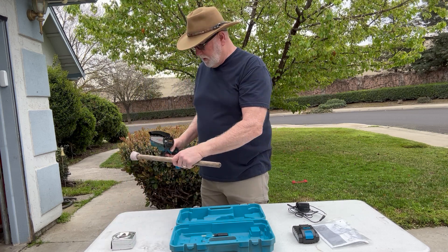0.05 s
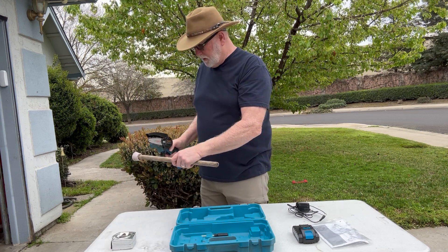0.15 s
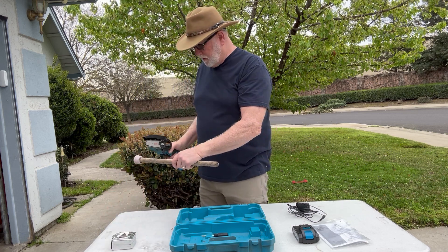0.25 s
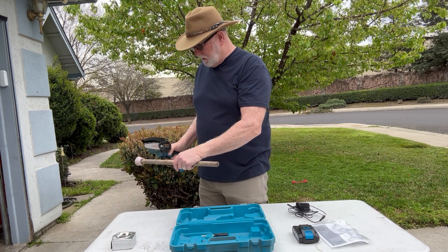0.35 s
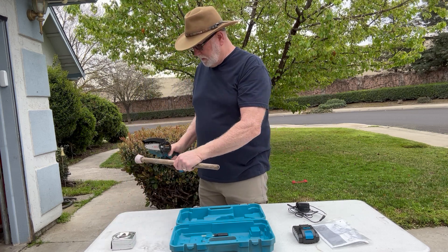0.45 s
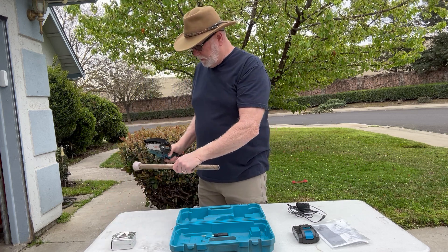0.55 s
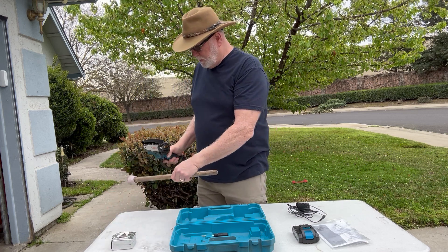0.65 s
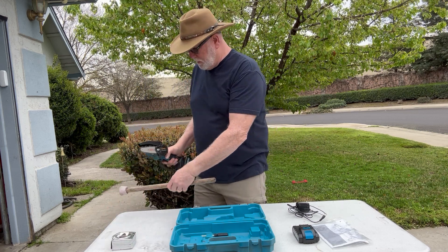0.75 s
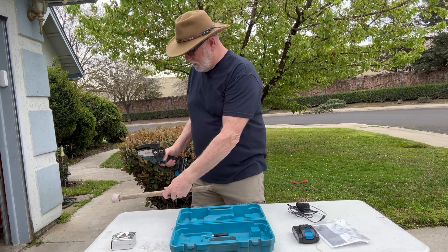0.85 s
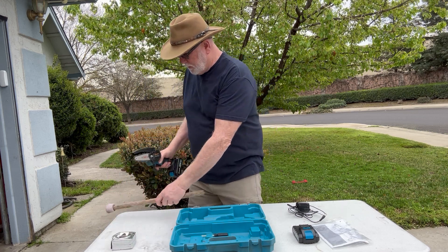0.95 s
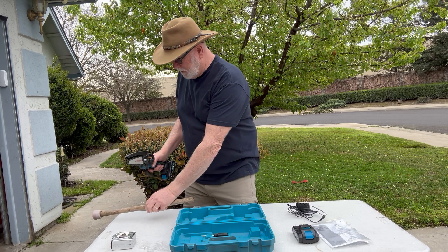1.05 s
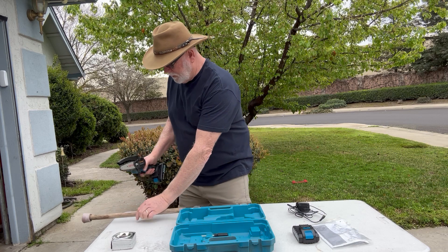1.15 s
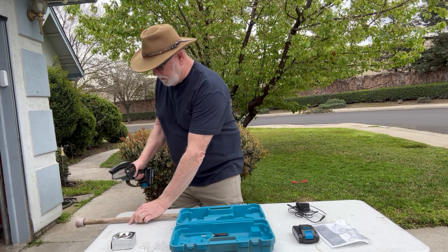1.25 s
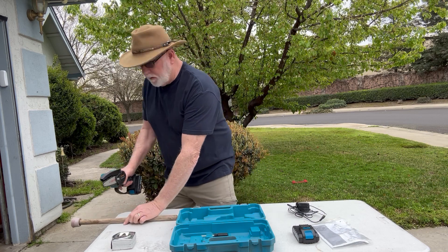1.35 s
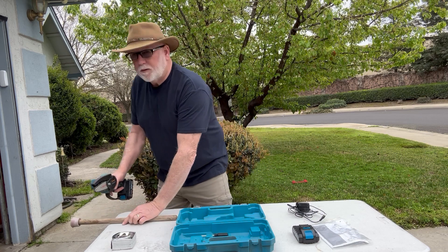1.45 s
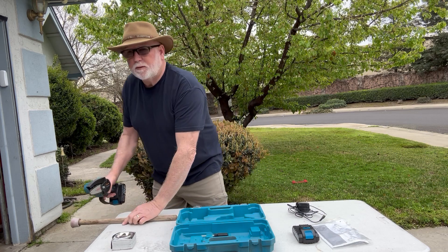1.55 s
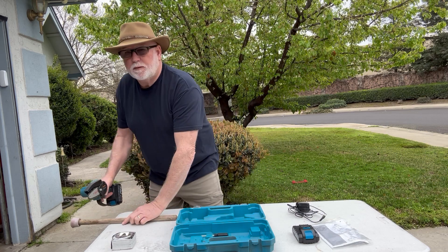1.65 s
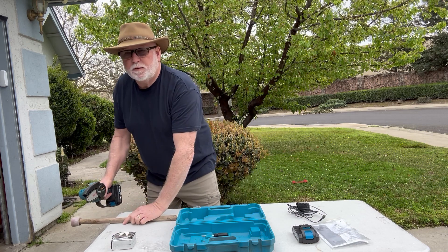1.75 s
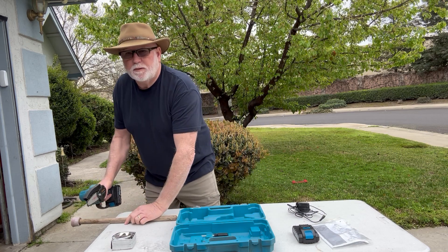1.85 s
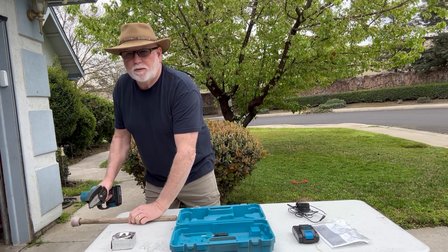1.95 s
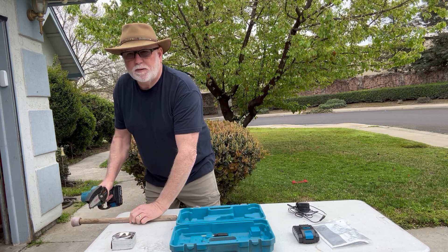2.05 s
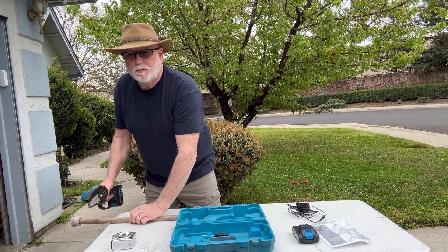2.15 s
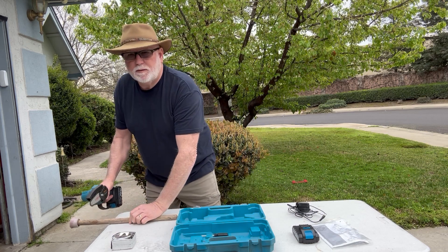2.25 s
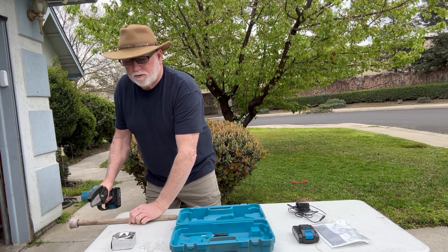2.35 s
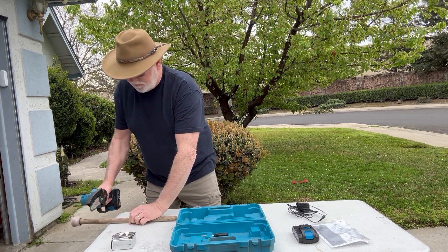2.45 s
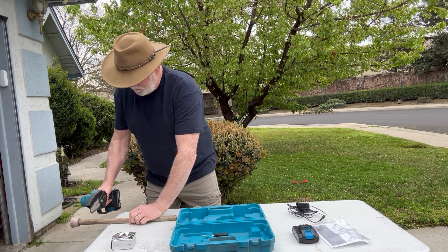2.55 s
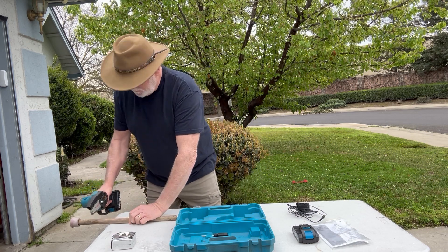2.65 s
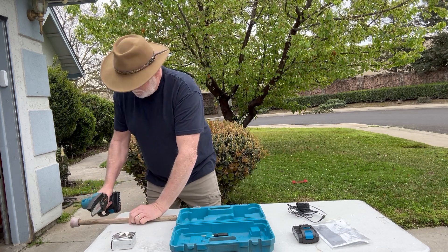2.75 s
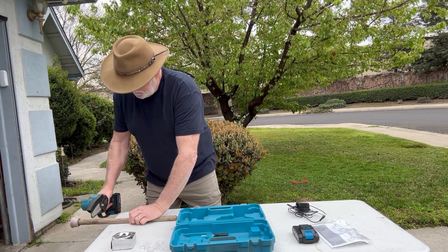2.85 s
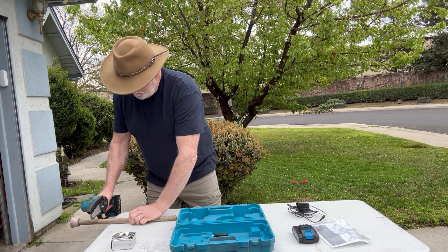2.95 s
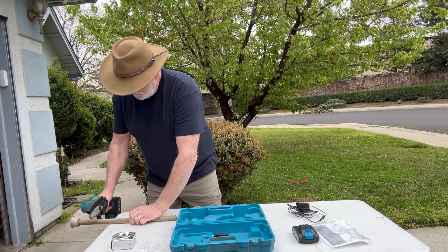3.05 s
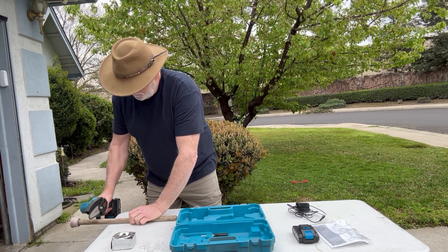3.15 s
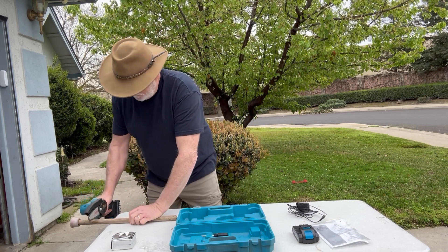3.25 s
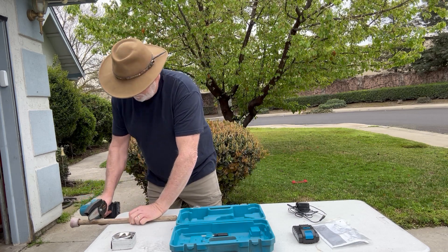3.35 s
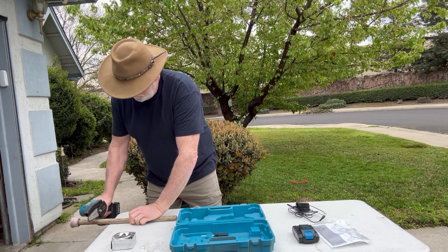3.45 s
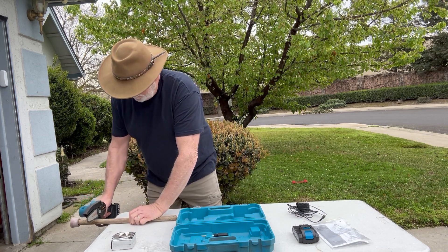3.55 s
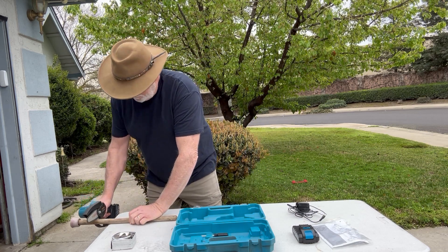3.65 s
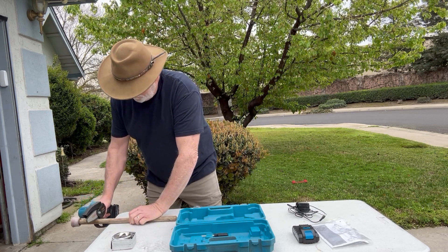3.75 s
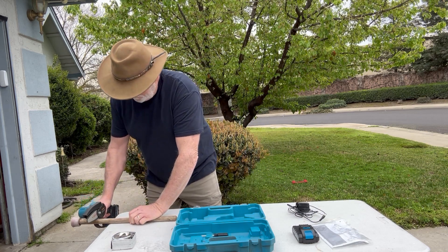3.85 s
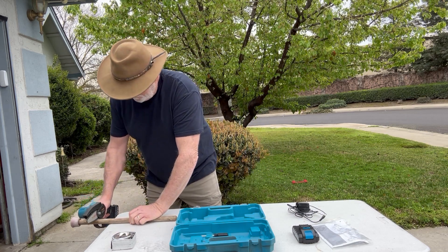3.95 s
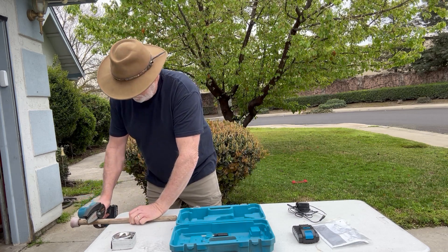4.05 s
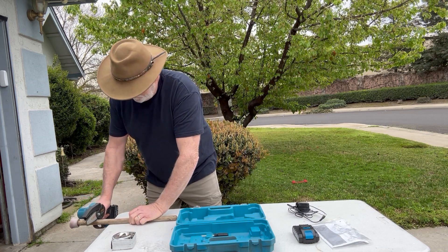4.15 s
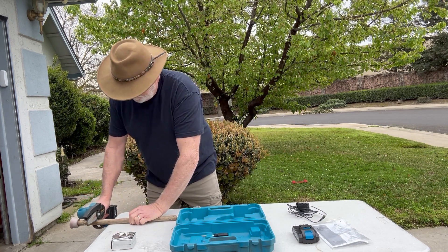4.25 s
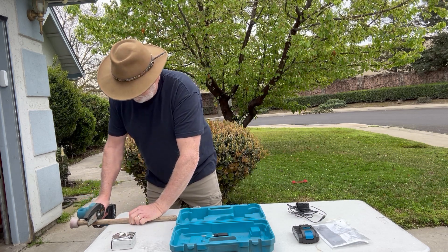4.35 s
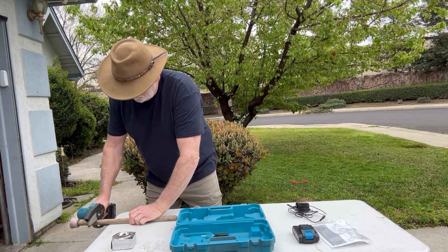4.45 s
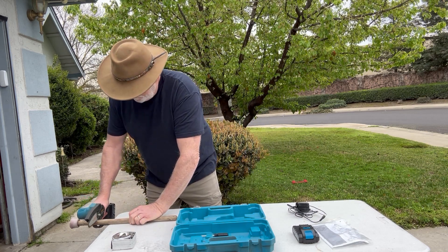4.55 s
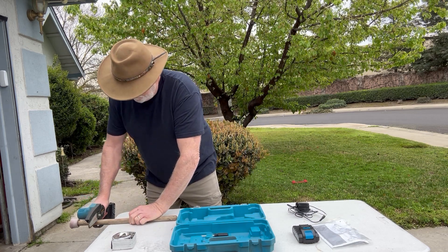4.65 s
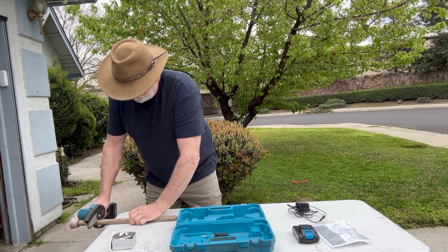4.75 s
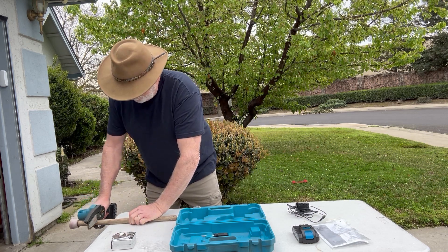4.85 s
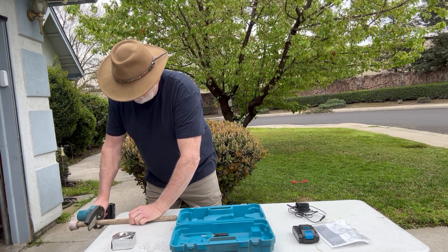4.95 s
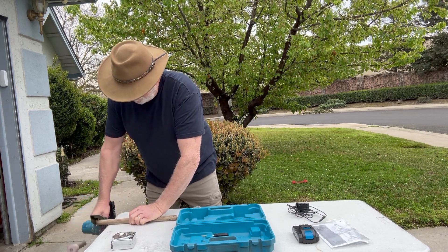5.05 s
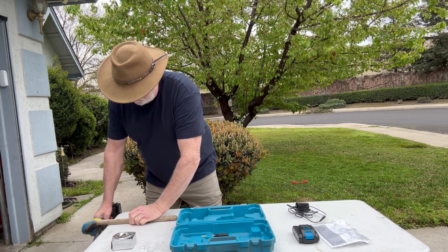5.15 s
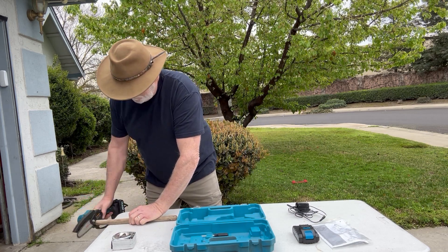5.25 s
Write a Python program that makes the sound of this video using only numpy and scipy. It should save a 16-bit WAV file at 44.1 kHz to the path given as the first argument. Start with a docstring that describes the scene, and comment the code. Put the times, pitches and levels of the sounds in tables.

```python
"""A small cordless chainsaw on a front lawn, close by: noise and sines follow its sprocket, then bites ring a rod.
Before that the wooden rod is laid on a plastic folding table: blows ring damped modes, cloth hisses, ticks click.
The saw runs free, skips, then cuts through the rod end, which drops onto paving.
Far traffic hums as shaped noise; a bird trills twice, a whistle in falling phrases.
A pair of close microphone ports hears the table from the left, with echoes off a house wall."""
import sys
import numpy as np
from scipy import signal
from scipy.fft import rfft, irfft, next_fast_len
from scipy.io import wavfile
from scipy.ndimage import uniform_filter1d

SR = 44100
rng = np.random.default_rng(int(sys.argv[2]) if len(sys.argv) > 2 else 0)


def log_audio(samples):
    """Write samples as a 16-bit WAV file to the path given in sys.argv[1]."""
    # one column per channel
    frames = np.atleast_2d(samples).T
    # limit to full scale, then quantise
    limited = np.clip(frames, -1, 1)
    pcm = np.round(limited * 32767).astype(np.int16)
    wavfile.write(sys.argv[1], SR, pcm)


N = 233461
TIME_S = np.arange(N) / SR
CONTACT_HZ = 1500   # softness of the skips and jolts of the bar on the rod


def from_db(db):
    """Decibels to an amplitude factor."""
    return 10 ** (np.asarray(db) / 20)


def rms_one(x):
    """Scale to rms 1."""
    return x / np.sqrt(np.mean(x ** 2) + 1e-20)


def evened(x, seconds):
    """Chance swells slower than the given time are levelled out; rms 1."""
    power = uniform_filter1d(np.mean(x ** 2, axis=0), round(seconds * SR))
    return x / np.sqrt(power + 1e-12)


def in_time(rows):
    """Columns as sample curves; the last output is 1 within the table's span, else 0."""
    s, *columns = np.transpose(rows)
    within = (TIME_S >= s[0]) & (TIME_S <= s[-1])
    return [np.interp(TIME_S, s, column) for column in columns] + [within]


def at_hz(points, hz):
    """Read a table of values along a logarithmic frequency axis."""
    p = np.array(points, float)
    return np.interp(np.log(hz + 1), np.log(p[:, 0] + 1), p[:, 1])


def shaped(x, response):
    """Filter by a function of frequency."""
    size = next_fast_len(N + SR // 2)
    hz = np.arange(size // 2 + 1) * SR / size
    return irfft(rfft(x, size) * response(hz), size)[..., :N]


def drift(rate_hz):
    """Slow chance with spread 1."""
    r = np.exp(-2 * np.pi * rate_hz / SR)
    slow = signal.lfilter([1], [1, -2 * r, r * r], rng.standard_normal(N + SR))
    return rms_one(slow[SR:])


def lagged(db, seconds):
    """A level that follows late and smoothly."""
    r = np.exp(-1 / (seconds * SR))
    return signal.lfilter([1 - r], [1, -r], from_db(db))


def dying(x, t60_s):
    """Each sample of x leaves a tail that falls 60 dB in the given time."""
    return signal.lfilter([1], [1, -from_db(-60 / (t60_s * SR))], x)


def ring(force, modes, bend_s=0):
    """Each mode rings on the force, neighbours in opposite sign; a wandering delay bends its pitch."""
    out, n = 0, np.arange(N)
    for k, (hz, level_db, t60) in enumerate(modes):
        r, w = from_db(-60 / (t60 * SR)), 2 * np.pi * hz / SR
        mode = signal.lfilter([0, np.sin(w)], [1, -2 * r * np.cos(w), r * r], force + 1e-18)
        mode = np.atleast_2d(mode)
        if bend_s:
            read = n + bend_s * SR * drift(3.18)
            mode = np.array([np.interp(read, n, side) for side in mode])
        out = out + (-1) ** k * from_db(level_db) * mode
    return out


def grains(per_s, spread_db):
    """Random clicks of uneven size and sign."""
    sizes = from_db(spread_db * np.minimum(rng.exponential(1, N), 4))
    signs = rng.choice([-1, 1], N)
    return sizes * signs * (rng.random(N) < per_s / SR)


def blows(rows, contact_hz):
    """A click for each row, softened by the contact."""
    force = np.zeros(N)
    for s, level_db in rows:
        force[round(s * SR)] = from_db(level_db)
    r = np.exp(-2 * np.pi * contact_hz / SR)
    return signal.lfilter([1 - r], [1, -r], force)


# part of the clatter that reaches each port by its own path: [f/Hz, share 0-1]
OWN_SHARE = [(150, 0), (500, 0.12), (3000, 0.45), (6000, 0.45), (10000, 0.1)]


def paired(make):
    """One common draw plus a smaller draw for each port."""
    share = lambda hz: np.clip(at_hz(OWN_SHARE, hz), 0, 1)
    common = shaped(rms_one(make()), lambda hz: np.sqrt(1 - share(hz)))
    own = rms_one(np.array([make(), make()]))
    return common + shaped(own, lambda hz: np.sqrt(share(hz)))


# colour of the far traffic: [f/Hz, level per Hz/dB]
TRAFFIC = [(12, -49), (20, -56), (50, 0.5), (104, -1.5), (223, -8.5), (257, -16), (478, -13), (684, -16),
           (1050, -19), (1130, -20), (1400, -20), (2310, -34), (4600, -57.5), (6000, -59), (7800, -91),
           (13200, -120)]
# how alike the traffic is at left and right: [f/Hz, likeness -1 to 1]
TRAFFIC_LIKENESS = [(25, 0.56), (60, 1), (130, 0.92), (240, 0.75), (950, -0.12), (3770, 0.37), (15000, 0.4)]
# the far rumble gets weaker towards the end: [t/s, level/dB]
TRAFFIC_FADE = [(0, 1), (3.8, 0.5), (5.29, -3.5)]
TRAFFIC_DB = -38.5   # before the fade


def traffic():
    """Low rumble from afar, noise alike on both sides in the bass, swelling slowly."""
    mid, side = rng.standard_normal((2, N))
    alike = lambda hz: np.clip(at_hz(TRAFFIC_LIKENESS, hz), -1, 1)
    colour = lambda hz: from_db(at_hz(TRAFFIC, hz))
    mid = shaped(mid, lambda hz: colour(hz) * np.sqrt(1 + alike(hz)))
    side = shaped(side, lambda hz: colour(hz) * np.sqrt(1 - alike(hz)))
    pair = rms_one(np.array([mid + side, mid - side]))
    level_db = TRAFFIC_DB + in_time(TRAFFIC_FADE)[0] + 1.0 * drift(1.0)
    return from_db(level_db) * pair * from_db([[.9], [-.9]])   # a little louder at the left


# colour of the cloth hiss: [f/Hz, level per Hz/dB]
CLOTH = [(1200, 0), (2500, 5.5), (3400, -4), (4300, 5.5), (6000, -3), (7700, -2), (11000, -5.5),
         (15700, -18)]
# cloth and hands sliding: [t/s at the height, level/dB, rise/dB per s, fall/dB per s]
SLIDES = [(.22, -65, 400, 450), (.37, -65, 267, 450), (.745, -54.5, 520, 170), (1.11, -61, 49, 180),
          (1.32, -53, 202, 113), (1.55, -59, 107, 64), (1.701, -37.5, 251, 252), (1.97, -67, 100, 330)]
# small ticks of handled wood and tool, the trigger click, and last the sharp click of the offcut landing:
# [t/s, click level/dB]
TICKS = [(0.2094, -50), (0.2364, -49), (0.3554, -57), (0.3661, -60), (0.7317, -39), (0.764, -32),
         (0.7824, -42), (1.4745, -51), (1.5863, -48), (1.7933, -57), (2.2546, -15), (5.2112, -8)]


def handling():
    """Grainy cloth hiss swells with each slide; short dry ticks, and a crack on top of knocks and landing."""
    swells = sum(from_db(db - np.maximum(rise * (s - TIME_S), fall * (TIME_S - s)))
                 for s, db, rise, fall in SLIDES)
    hiss = rng.standard_normal(N) + 0.6 * rms_one(grains(per_s=600, spread_db=3.5))
    hiss = rms_one(shaped(hiss, lambda hz: from_db(at_hz(CLOTH, hz)) * (hz > 600)))
    # each tick is a sharp click followed by a short burst of noise
    cracks = [(s, crack_db) for s, _, crack_db in KNOCKS]
    clicks = blows(TICKS + cracks, contact_hz=15000)
    burst = dying(clicks, t60_s=0.029) * rng.standard_normal(N)
    band = signal.butter(1, [2000, 5500], "band", fs=SR, output="sos")
    return swells * hiss + signal.sosfilt(band, 2.7 * clicks + 0.78 * burst)


# phrases of the two bird trills: [t/s, length/s, starting f/Hz, starting level/dB]
PHRASES = [(0.317, 0.07, 7040, -66), (0.36, 0.046, 7050, -52.5), (0.402, 0.062, 7360, -52),
           (0.466, 0.064, 7350, -57), (0.53, 0.055, 7360, -59), (.605, 0.057, 7430, -69),
           (.652, .05, 7300, -80), (1.742, 0.04, 6900, -51), (1.795, 0.049, 7340, -57),
           (1.86, .06, 7300, -61), (1.925, 0.051, 7320, -63), (2.0, .06, 7300, -75)]
PHRASE_FALL_HZ, PHRASE_FADE_DB = 600, 15.5   # over one phrase
WARBLE_HZ, WARBLE_DEPTH_HZ = 49.3, 890   # rate of the dips; deepest at the end of a phrase


def bird():
    """A whistle in short falling phrases that end in quick dips, smeared by echoes among leaves."""
    hz, level = np.zeros(N), np.zeros(N)
    uneven = 0.3 * drift(21)
    for s, length_s, start_hz, db in PHRASES:
        through = (TIME_S - s) / length_s      # 0 to 1 through the phrase
        on = (through >= 0) & (through < 1)
        swing = np.sin(2 * np.pi * WARBLE_HZ * (TIME_S - s) + 0.94 + uneven)
        dips = WARBLE_DEPTH_HZ * through ** 2 * np.maximum(swing, 0) ** 4
        hz[on] = (start_hz - through * (PHRASE_FALL_HZ + dips))[on]
        onset = np.minimum(through[on] / 0.04, 1)
        level[on] = from_db(db - PHRASE_FADE_DB * through[on]) * onset
    phase = 2 * np.pi * np.cumsum(hz + 40 * drift(200)) / SR
    whistle = level * from_db(1.3 * drift(150)) * np.sin(phase)
    leaves = rng.standard_normal((2, SR // 5)) * from_db(-28 - 60 * TIME_S[:SR // 5] / 0.25)
    return whistle + signal.fftconvolve(whistle[None], leaves, axes=1)[:, :N]


# rod knocking on the table, with bounces, and jumping as the end snaps off:
# [t/s, blow level/dB, crack level/dB]
KNOCKS = [(1.26, -25, -54), (1.268, -21.5, -62), (1.28, -33.5, -64), (1.309, -14, -33), (1.321, -26, -55),
          (1.353, -26, -50), (1.395, -30, -80), (5.039, -19.5, -31), (5.112, -32, -54)]
# modes of loose rod and bare table top: [f/Hz, level/dB, t60/s]
LOOSE = [(123.6, -1, 0.16), (157, -5.5, 0.15), (186.2, -9, 0.47), (222, -10.5, 0.17), (280.4, -7, 0.23),
         (394, -5, 0.084), (440.6, -7.5, 0.23), (517, 1.5, 0.061), (577, -0.5, 0.14), (627, -5.5, 0.062),
         (960, -2.5, 0.014), (1067, -15.5, 0.041), (1260, -3.5, 0.028), (1530, -9.5, 0.014),
         (1970, 0.5, 0.007), (2260, -5, 0.008), (3180, 0.5, 0.004), (4830, -4, 0.0035)]
# cut end landing on paving: [t/s, blow level/dB]
LANDING = [(5.2112, -21), (5.2153, -6), (5.2222, -12)]
# modes of the cut end: [f/Hz, level/dB, t60/s]
OFFCUT = [(1760, -4, 0.02), (2240, 2, 0.017), (2920, 14, 0.011), (5600, 15, .006), (7300, 0, 0.009)]
KNOCK_CONTACT_HZ = 800   # the plastic top gives under the rod


def knocks():
    """The rod hits the table and rattles briefly after each blow; the offcut hits the paving."""
    laid = blows([(s, blow_db) for s, blow_db, _ in KNOCKS], KNOCK_CONTACT_HZ)
    rattle = dying(laid, t60_s=.08) * rms_one(grains(per_s=2800, spread_db=2.5))
    rod = ring(laid + from_db(-27.5) * rattle, LOOSE, bend_s=0.000298)
    offcut = ring(blows(LANDING, contact_hz=9000), OFFCUT)
    return from_db(-5.0) * rod + from_db(-19.5) * offcut


# chain and housing, broad colour: [f/Hz, level per Hz/dB]
CHAIN = [(200, -16), (320, -22), (500, -13), (950, -16), (1700, -3), (2900, -7), (4600, -5), (7500, -1),
         (10500, -1), (12500, -4), (14300, -4), (15700, -2)]
# housing and bar resonances: [f/Hz, width/Hz, level above the colour/dB]
HOUSING = [(668, 54, 14), (713, 56, 18), (780, 45, 15), (1350, 94, 1.5), (1750, 190, -2), (1990, 200, 2),
           (2150, 600, 2), (2970, 83, -23), (3920, 1640, 3.5), (4026, 90, 8), (7290, 650, 0)]


def housing_colour(hz):
    """Broad colour with steep-sided resonance humps."""
    humps = sum(from_db(2 * db) / (1 + (2 * (hz - mid_hz) / width_hz) ** 2) ** 2
                for mid_hz, width_hz, db in HOUSING)
    return from_db(at_hz(CHAIN, hz)) * np.sqrt(1 + humps)


# chain speed, sagging under load: [t/s, drive links per s]
SPEED = [(2.24, 320), (2.33, 356), (2.40, 384), (2.55, 394), (3.67, 397), (3.86, 380), (4.2, 378),
         (4.3, 372), (4.6, 368), (5.0, 372), (5.1, 385), (5.29, 340)]
SPROCKET_TEETH, CUTTERS_PER_TURN = 7, 2


def sprocket_turns():
    """Angle of the sprocket in radians; each tooth carries one drive link."""
    links_per_s, _ = in_time(SPEED)
    return 2 * np.pi * np.cumsum(links_per_s) / SR / SPROCKET_TEETH


# level of the chain hiss, weaker in parts of the cut and after it, fading as the saw runs down:
# [t/s, level/dB]
HISS = [(2.24, -73), (2.25, -43.5), (2.26, -34), (2.3, -26.5), (2.68, -26), (2.99, -26.5), (4.1, -26),
        (4.25, -32), (4.28, -26), (5.0, -31), (5.02, -35), (5.22, -33), (5.29, -36.5)]
# side tones of the drive: [multiple of the sprocket turn, level against the hiss/dB]
DRIVE_TONES = [(6, -25.5), (12.6, -23), (14, -28), (28, -29)]
BODY_HZ, BODY_RISE_S = 1100, .025   # the low clatter of the housing blooms after the hiss
HUM_LOSS_DB = 8   # the wood damps the hum of the housing from the first bite on
TONE_LOCKS_S, TONE_RISE_DB_PER_S = 2.35, 220   # the drive tones emerge as the chain comes up to speed
TONE_UNDER_HISS_DB = -9.5
TONE_SETTLES_DB_PER_S = 2.5   # then the link tone slowly weakens
TONE_UNDER_BITE_DB, TONE_LOSS_DB_PER_S = -8, 12.5   # wood passes the tone on, less as the kerf deepens
TONE_WAVER_DB = 2.5
CUT_THROUGH_S, TONE_FREED_DB = 5.0, 4.5   # the link tone stands clear again once the bar is through


def saw(turns, bite_db):
    """Links clatter along the bar in time with sprocket and teeth; the drive hums at multiples of the turn."""
    hiss_db, running = in_time(HISS)
    first_bite_s = BITE[0][0]
    beat_db = np.cos(turns) + 1.14 * np.cos(CUTTERS_PER_TURN * turns) + np.cos(SPROCKET_TEETH * turns)
    clatter = paired(lambda: rng.standard_normal(N) + .5 * rms_one(grains(per_s=2500, spread_db=2.0)))
    clatter = shaped(clatter * from_db(beat_db + 1.11 * drift(26)), housing_colour)
    body = signal.sosfilt(signal.butter(2, BODY_HZ, fs=SR, output="sos"), clatter)
    clatter = clatter - body * np.exp(-np.maximum(TIME_S - HISS[0][0], 0) / BODY_RISE_S)
    hum = shaped(clatter, lambda hz: (hz > 620) & (hz < 860))
    clatter = clatter - hum * (1 - lagged(-HUM_LOSS_DB * (TIME_S > first_bite_s), seconds=0.03))

    since_s = TIME_S - TONE_LOCKS_S
    locked = from_db(TONE_RISE_DB_PER_S * np.minimum(since_s, 0))
    sides = sum(from_db(db + 1.9 * drift(4.8)) * np.sin(k * turns + rng.uniform(0, 2 * np.pi))
                for k, db in DRIVE_TONES)
    free_db = hiss_db + TONE_UNDER_HISS_DB - TONE_SETTLES_DB_PER_S * since_s + 1.0 * drift(39)
    free = from_db(free_db) * locked * lagged(TONE_FREED_DB * (TIME_S > CUT_THROUGH_S), seconds=0.05)
    loaded_db = bite_db + TONE_UNDER_BITE_DB - TONE_LOSS_DB_PER_S * (TIME_S - first_bite_s)
    loaded = lagged(loaded_db + TONE_WAVER_DB * drift(7.4), seconds=0.023)
    links = (free + loaded) * np.sin(SPROCKET_TEETH * turns)
    return running * (from_db(hiss_db) * (from_db(8.5) * rms_one(clatter) + locked * sides) + links)


# the running chain first skips on the rod before it bites: [t/s, knock level/dB, rasp level/dB]
SKIPS = [(3.688, -22.5, -30.5), (3.695, -22, -53), (3.706, -23.5, -35), (3.719, -31.5, -61),
         (3.745, -29, -47)]
# modes of the table top under the rod: [f/Hz, level/dB, t60/s]
TABLE = [(115.8, 2.5, 0.63), (173.8, 0, 0.24), (208.6, 5, 0.057), (225.5, 4, 0.15), (271.2, 2.5, 0.36)]
# modes of the rod held on the table: [f/Hz, level/dB, t60/s]
ROD = [(392.2, -4, 0.14), (453.3, -4.5, 0.17), (517, 4.5, 0.062), (603.4, 3.5, 0.11), (687, 2, 0.07),
       (833, 0, 0.066), (950, -6, 0.095), (1085, -5, 0.059)]
# modes of wood fibres tearing: [f/Hz, level/dB, t60/s]
FIBRES = [(1090, -30, 0.23), (1226, 4.5, 0.012), (1317, -0.5, 0.056), (1830, 10, 0.0072),
          (1935, 7.5, 0.025), (2170, 18, 0.0022), (2875, 5, 0.0075), (3690, 15.5, 0.0022)]


def skips():
    """Each skip knocks rod and table and rips a few fibres."""
    knock = blows([(s, db) for s, db, _ in SKIPS], CONTACT_HZ)
    rip = blows([(s, db) for s, _, db in SKIPS], contact_hz=9000)
    rip = rip + 0.26 * dying(rip, t60_s=0.027) * rng.standard_normal(N)
    return ring(knock, ROD) + from_db(-12.0) * ring(knock, TABLE[1:]) + ring(rip, FIBRES)


# how hard the chain bites into the rod: [t/s, level/dB, fibre rasp against the bite/dB]
BITE = [(3.8, -40, -7), (3.806, -42, -1), (3.838, -15, -21), (3.966, -19.5, -3.5), (3.998, -26.5, -5),
        (4.036, -14, -2), (4.076, -19.5, -4), (4.11, -14, -14), (4.236, -22.5, -28), (4.27, -38, -8),
        (4.278, -21, -14), (4.302, -13.5, -8.5), (4.356, -20.5, -1), (4.396, -15, -4), (4.508, -21, -5.5),
        (4.54, -24, 0.5), (4.606, -16, -5.5), (4.708, -14, -9.5), (4.812, -18, -5.5), (5.0, -14.5, -11),
        (5.028, -33, -5), (5.04, -23, -12), (5.16, -48, -4), (5.2, -35, -3)]


def bite():
    """Levels of bite and fibre rasp; the bite is all but silent outside the cut."""
    bite_db, rasp_db, cutting = in_time(BITE)
    return np.where(cutting, bite_db, -120), rasp_db


# table top under the cut, as the hand's weight shifts and the rod breaks through:
# [t/s, boom level/dB, thrum level/dB]
TABLE_TOP = [(3.8, -36, -53), (3.826, -48, -49), (3.858, -22, -35), (3.896, -30, -30), (3.924, -25, -23),
             (3.962, -25, -29), (4.01, -34, -31), (4.162, -21.5, -28), (4.266, -52, -41), (4.298, -27, -32),
             (4.458, -24.5, -25.5), (4.5, -36, -32), (4.528, -28.5, -27.5), (4.828, -39, -24.5),
             (4.876, -31, -28.5), (4.958, -21.5, -17), (5.074, -29, -29), (5.102, -56, -36),
             (5.144, -46, -43), (5.2, -61, -51)]
# the bar chatters in the kerf, each grab of the chain rips a burst of fibres: [t/s, relative level/dB]
GRABS = [(3.817, -2.5), (3.84, -4.5), (3.8777, -3.5), (3.9047, -7), (3.9316, -20), (4.018, -10),
         (4.084, -2), (4.1142, -5), (4.146, 1), (4.1706, -5), (4.2216, -3.5), (4.2618, -2.5), (4.2943, -11),
         (4.3511, -11), (4.413, -7.5), (4.4589, -6), (4.4938, -5.5), (4.5277, -17), (4.5866, -16),
         (4.6051, -23), (4.694, -8), (4.719, -10), (4.7517, -33), (4.9164, -18), (4.9368, -31),
         (5.0376, -12.5)]
# the bar snatches and jolts the rod against the table: [t/s, relative level/dB]
JOLTS = [(3.835, -16.5), (3.841, -14.5), (3.906, -8.5), (4.016, -14), (4.044, -9.5), (4.115, -10.5),
         (4.149, -6.5), (4.278, -8.5), (4.299, -9.5), (4.667, -10.5), (4.7, -16), (4.714, -11.5),
         (4.728, -5.5), (4.752, -9), (4.979, -8)]
GRAB_LEAD_S = 0.0039   # the load builds just before the fibres let go
GRAB_RISE_S, GRAB_FALL_S, GRAB_DB, GRAB_IN_ROD_DB = .004, .011, -7.0, -9.0
CHATTER_DB, CHATTER_PER_S = 2, 52   # smaller unevenness of the rasp between grabs
JOLT_DB = -14


def cut(turns, bite_db, rasp_db):
    """Cutters bite unevenly twice a sprocket turn and tear fibres in between; rod and table ring."""
    cutter_count = np.floor(CUTTERS_PER_TURN * turns / (2 * np.pi) + .15 * drift(40))
    passes = np.diff(cutter_count, prepend=0) > 0
    bites = passes * from_db(4 * rng.standard_normal(N))
    tearing = paired(lambda: grains(per_s=1000, spread_db=3.5)) * from_db(1.5 * drift(24))
    force = 0.62 * rms_one(bites) + tearing

    grabs = 0
    for s, db in GRABS:
        since_s = np.maximum(TIME_S - s + GRAB_LEAD_S, 0)
        pulse = np.exp(-since_s / GRAB_FALL_S) - np.exp(-since_s / GRAB_RISE_S)
        grabs = grabs + from_db(db + GRAB_DB) * pulse
    rasp = from_db(bite_db + rasp_db + CHATTER_DB * drift(CHATTER_PER_S)) + grabs
    rod = from_db(bite_db - 2.0) + from_db(GRAB_IN_ROD_DB) * grabs

    boom_db, thrum_db, cutting = in_time(TABLE_TOP)
    # grip and depth of cut keep changing, so the low modes wander in pitch
    bodies = [(ROD, rod, .0008),
              (TABLE[:1], cutting * from_db(boom_db), .002),
              (TABLE[1:], cutting * from_db(thrum_db), .002),
              (FIBRES, rasp, 0)]
    ringing = sum(level * evened(ring(force, modes, bend_s), seconds=0.041)
                  for modes, level, bend_s in bodies)
    return ringing + from_db(JOLT_DB) * ring(blows(JOLTS, CONTACT_HZ), ROD + TABLE[1:])


# sound from the table, phase between the ports: [f/Hz, left lead/rad]
PORT_PHASE = [(0, 0), (780, -0.5), (1380, 0.9), (2930, 0.7), (3270, 1.7), (4130, 1.9), (4480, 2.7),
              (8180, 6.4), (9730, 9.1), (10900, 9.9), (12400, 12.6), (13100, 12.7), (14600, 15.5),
              (15300, 15.8)]
# sound from the table, balance of the ports: [f/Hz, left minus right level/dB]
PORT_BALANCE = [(60, 2.0), (130, 1.5), (290, 3.5), (640, 3.5), (1410, 0.5), (3100, -0.5), (6820, -1.0),
                (15000, 0.0)]
WALL_DB, WALL_T60_S, WALL_CUT_HZ = -13, .15, 4000


def ports(x):
    """Each port gets the table with its own level and phase, and its own dull echoes off wall and ground."""
    side = np.array([[.5], [-.5]])   # half of each difference to left and right
    balance = lambda hz: from_db(side * at_hz(PORT_BALANCE, hz))
    direct = shaped(x, lambda hz: balance(hz) * np.exp(1j * side * at_hz(PORT_PHASE, hz)))
    t = np.arange(SR // 4) / SR
    tail = rng.standard_normal((2, len(t))) * from_db(-60 * t / WALL_T60_S) * (t > .003)
    tail = signal.sosfilt(signal.butter(2, [650, WALL_CUT_HZ], "band", fs=SR, output="sos"), tail)
    tail = tail / np.sqrt(np.sum(tail ** 2, axis=1, keepdims=True))
    return direct + from_db(WALL_DB) * signal.fftconvolve(x, tail, axes=1)[:, :N]


def scene():
    """Everything at the table reaches the ports together; bird and traffic come from afar."""
    turns = sprocket_turns()
    bite_db, rasp_db = bite()
    table = handling() + knocks() + saw(turns, bite_db) + skips() + cut(turns, bite_db, rasp_db)
    # small bodies radiate no deep bass
    table = signal.sosfilt(signal.butter(4, 88, "high", fs=SR, output="sos"), table)
    return traffic() + bird() + ports(table)


CUTOFF_HZ = 15720


def record(dry):
    """Peaks are rounded softly, and next to nothing sounds above the cutoff."""
    rounded = 1.1 * np.tanh(dry / 1.1)
    return signal.sosfilt(signal.ellip(14, .3, 75, CUTOFF_HZ, fs=SR, output="sos"), rounded)


dry = scene()
out = record(dry)
log_audio(out)
```